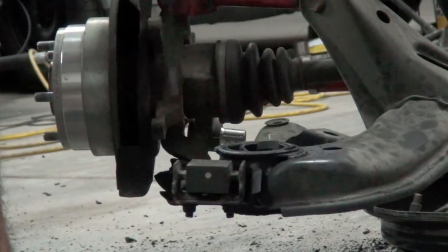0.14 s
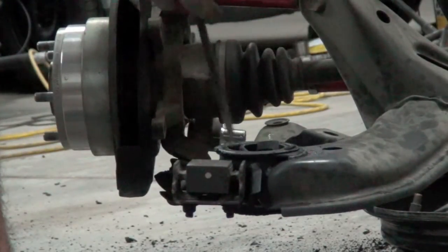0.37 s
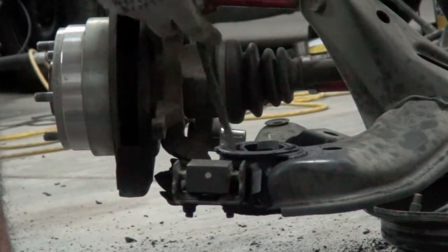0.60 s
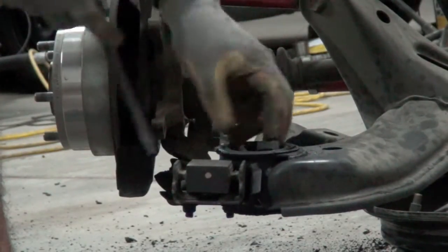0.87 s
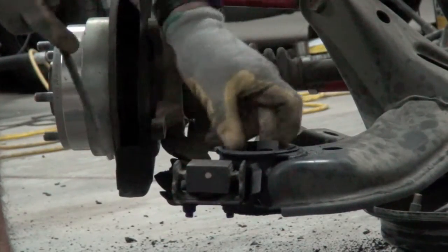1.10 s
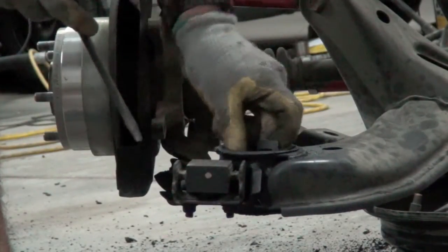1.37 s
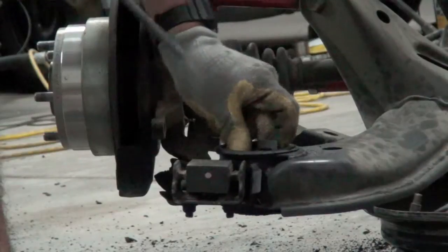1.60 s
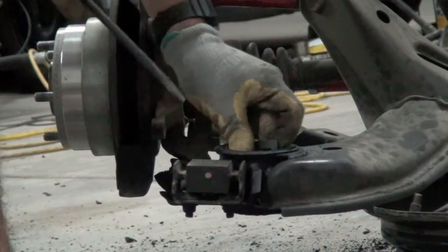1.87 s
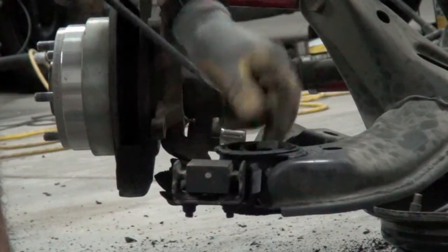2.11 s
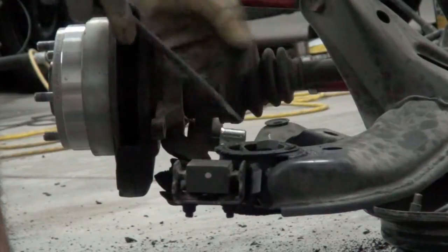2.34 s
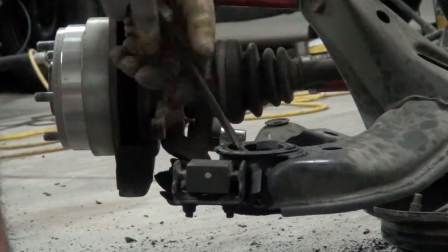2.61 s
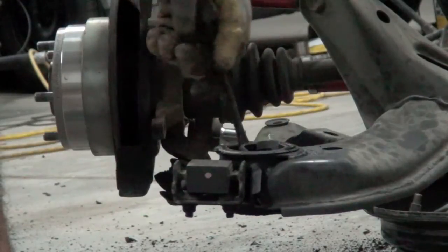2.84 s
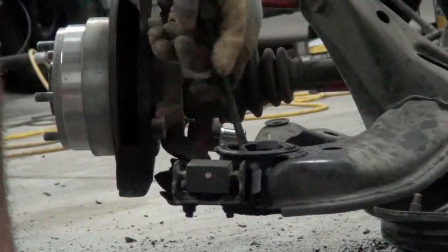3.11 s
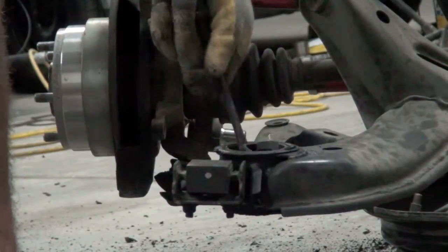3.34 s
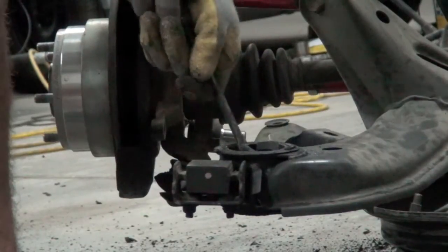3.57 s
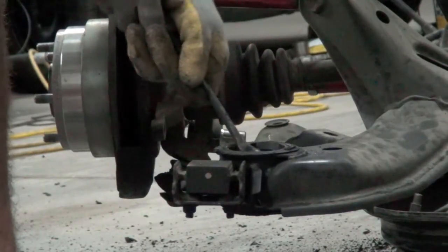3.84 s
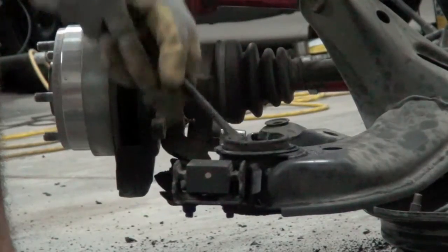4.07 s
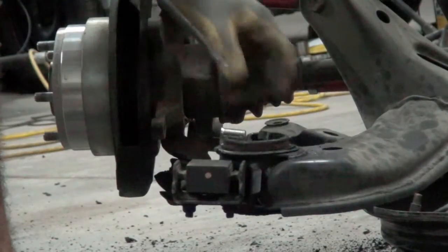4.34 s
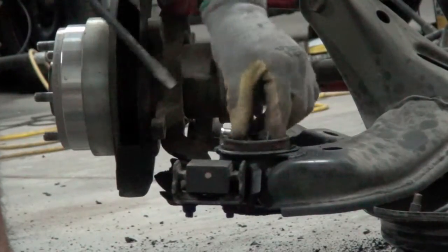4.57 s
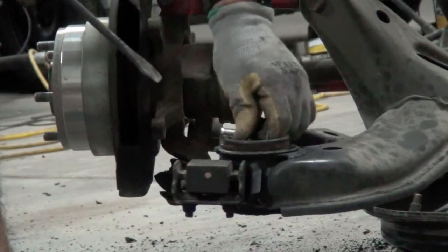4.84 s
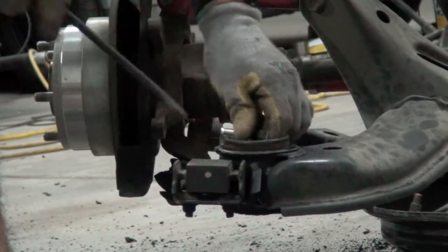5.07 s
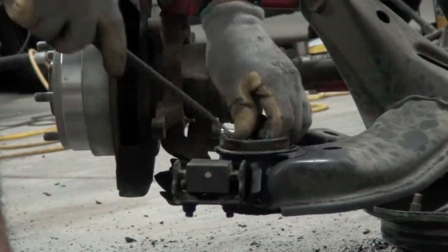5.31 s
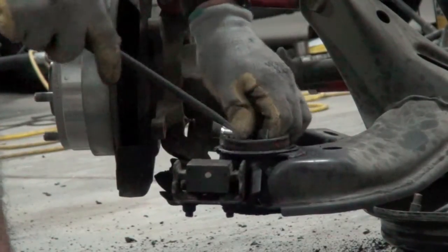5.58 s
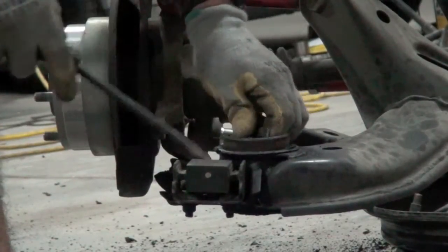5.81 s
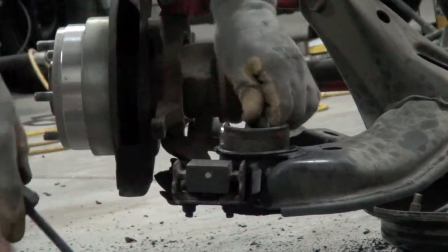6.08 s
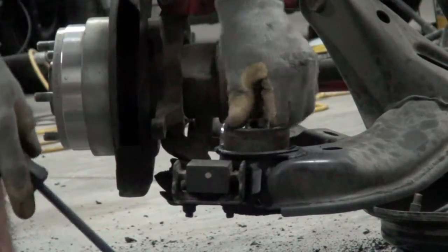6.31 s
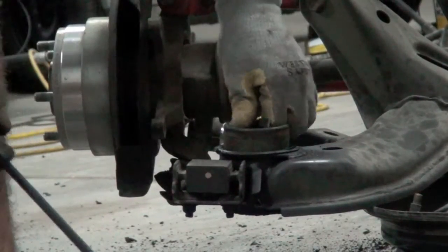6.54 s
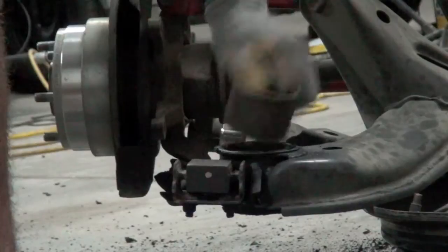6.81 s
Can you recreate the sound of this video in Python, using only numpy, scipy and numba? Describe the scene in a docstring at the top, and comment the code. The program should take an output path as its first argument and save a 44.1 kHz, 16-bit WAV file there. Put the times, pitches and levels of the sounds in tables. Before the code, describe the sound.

Sharp metal strikes recorded close, with about a second of bright room echo. Two strong hits come early, then quiet touches, a knock and a run of tiny rod-tip ticks, a heavy clattering blow midway, small dull clonks as a ring is worked loose, and a closing clank. Far off, an engine climbs and drops repeatedly above rumble and faint hiss.

```python
"""A steel rod knocks and prises metal rings out of a suspension arm in a hard-walled garage, close by.
Each blow sets off fading tones, a dense clank, a bright crack and a low thud, made by short noisy pushes.
Bursts of noise make the rod tip tick and scrape, and one tops up the crack of a blow on the ring.
Fading noise echoes let the garage ring on for a second.
Far away an engine, built from sine waves, revs up again and again over a low hum, rumble and hiss."""
import sys
import numpy as np
from scipy import signal
from scipy.fft import rfft, irfft
from scipy.io import wavfile
from scipy.ndimage import uniform_filter1d, map_coordinates
from numba import njit

SR = 44100
rng = np.random.default_rng(int(sys.argv[2]) if len(sys.argv) > 2 else 0)


def undo_db(level):
    """Turn decibels back into plain size, where 20 dB means ten times bigger."""
    steps = np.asarray(level, float) / 20
    return 10 ** steps


def materialize(psi):
    """Save the field psi as 16-bit PCM at rate SR to the path in sys.argv[1].

    A 1-D psi becomes a single channel; in a 2-D psi each row is a channel.
    """
    bounded = np.clip(np.atleast_2d(psi).T, -1, 1)
    quanta = np.round(bounded * 32767).astype(np.int16)
    wavfile.write(sys.argv[1], SR, quanta)


N = 305613  # length of the scene in samples
LEAD = SR // 5  # samples of room ahead of time 0, for blows that start before it
LONG = 32768  # samples in the push of one blow

# Low rumble and hiss. Each row: pitch in Hz, relative level in dB per Hz.
AIR = [(15, -23), (25, -21), (134, -5.5), (180, -11.5), (301, -17.5), (363, -19), (575, -22), (695, -21),
       (962, -21.5), (1160, -18), (1610, -21.5), (2690, -31.5), (5140, -31.5), (6740, -34.5),
       (16000, -36.5)]
AIR_DB = -57.5  # level of the part above 250 Hz, without the road noise
# Swell of the far road noise. Each row: time in seconds, level against the hiss in dB.
ROAD_SWELL = [(0, -6), (1, 2), (1.6, -13), (3.2, -4.5), (3.9, 4.5), (5.6, -1), (6.93, -1.5)]
# Humming motors. Each row: pitch in Hz, average rms level in dB.
HUM = [(60.4, -66), (68.5, -68.5), (85, -65)]
# Far engine climbing and dropping back. Each row: time in seconds, firing cycles per second in Hz.
REVS = [(0, 25.3), (.8, 28.6), (1.27, 19.5), (2.0, 22), (2.72, 25.4), (3.65, 28.8), (4.05, 29.4),
        (4.42, 21.5), (5.3, 23.4), (6.93, 30)]
# Loudness of the engine. Each row: time in seconds, level in dB before the other engine levels are added.
ENGINE_DB = [(0, -62), (1.2, -57), (2.0, -53), (2.6, -57), (4.0, -58), (5.1, -60.5), (5.7, -53.5),
             (6.93, -58)]
LIFT_DB = -3  # off the throttle while the revs fall
# Engine tones. Each entry: multiple of the cycle rate.
ORDER = (3, 4, 5, 6, 7, 8, 9)
# Strength of those tones, in the same order. Each entry: relative level in dB.
ORDER_DB = (-19, 7, -4, -1.5, -14.5, -4, -7.5)
# The garage lifts some low pitches and swallows others. Each row: pitch in Hz, change in dB.
LOW_ROOM = [(60, -13), (105, -48), (118, 3), (125, 0), (132, 7.5), (137, -1.5), (143, 9), (151, -3.5),
            (157, 5.5), (162, -4.5), (168, 2.5), (178, -8), (188, 0), (200, 0), (215, -12.5), (260, -20)]

# How long the garage echoes. Each row: pitch in Hz, time to fade by 60 dB in seconds.
GARAGE_T60 = [(200, 0.36), (500, 0.66), (1000, 0.75), (2000, 1.09), (4000, 1.314), (8000, 1.006),
              (14000, 0.57)]
GARAGE_DB, GARAGE_WIDE_DB = -6, -25  # echoes alike in both ears; unlike echoes before WIDE shapes them
# The part that differs between left and right. Each row: pitch in Hz, change in dB.
WIDE = [(60, -4), (300, -2.5), (1500, -9.5), (4000, -29), (8000, -33), (12000, -17), (16000, -20)]
# How much the sound leans to the right. Each row: pitch in Hz, side against middle in dB.
RIGHT_LEAN = [(30, -36), (70, -25), (130, -23), (300, -16), (600, -21), (1200, -28), (2400, -24),
              (4500, -40), (9000, -30), (16000, -50)]
# Sound reaching the left a little earlier. Each row: pitch in Hz, gain in dB on the per-sample slope.
LEFT_EARLY = [(300, -10), (1000, -13), (2000, -69), (4500, -29.5), (7500, -12), (9500, -17), (11500, -26),
              (16000, -45)]
# The direct work sounds come still earlier. Each row: pitch in Hz, gain in dB on the per-sample slope.
NEAR_EARLY = [(600, -33), (1400, -13.5), (2500, -12.5), (3800, -20), (6000, -51)]

# Steel or glove dragged over the part.
# Each row: start in seconds, end in seconds, rms level in dB before fades, centre pitch in Hz.
SCRAPES = [(1.006, 1.058, -52.5, 9800), (2.151, 2.175, -45.5, 4100), (2.773, 2.869, -45, 2400),
           (4.675, 4.763, -55.5, 9500), (5.44, 5.477, -50.5, 5050), (5.522, 5.543, -65, 7200),
           (5.882, 5.91, -52, 7300), (6.384, 6.45, -63, 7850), (6.823, 6.867, -42.5, 4440)]
# Rod tip ticking; the first row is the bright top of the ring blow's crack at .646 s.
# Each row: start in seconds, peak level in dB, centre pitch in Hz.
TICKS = [(.646, -14.5, 11400), (1.145, -33, 4140), (1.449, -42, 3050), (2.858, -27.5, 3460),
         (3.103, -44, 7900), (3.155, -42.5, 8400), (3.198, -41, 6670), (3.239, -37, 6740),
         (3.259, -39, 7650), (3.325, -40.5, 8400), (3.3556, -34, 7800), (3.3645, -27, 5800),
         (3.425, -39, 7600), (3.433, -31.5, 5700), (3.497, -38.5, 3930), (3.5324, -36, 6840),
         (3.628, -34.5, 7500), (5.746, -50, 3570), (6.335, -40, 3280), (6.387, -36.5, 3743),
         (6.678, -43, 5380)]
TICK_S = 0.0043  # fading time of each of these short noises
# faint ticks while the rod tip probes the seat: how many, when (s), middle level (dB), middle pitch (Hz)
GRIT_COUNT, GRIT_FROM_S, GRIT_TO_S, GRIT_DB, GRIT_HZ = 14, 2.7, 3.05, -44, 6500

# Tones of the ring. Each row: pitch in Hz, relative level in dB, free 60 dB fading time in seconds.
RING = [(705, -7, .5), (1080, -2, .6), (1660, -9, .5), (2040, -6, .5), (1217, -6, 0.44), (1728, -13, 0.64),
        (1873, -6, 0.64), (1933, -17, 2.3), (2336, -5, 0.65), (2530, -1, 0.45), (2998, -13, 0.77),
        (3122, -16, 0.61), (3278, -4, 0.36), (3321, -8, 0.45), (3402, -4, 0.67), (3472, -18, 1.4),
        (3768, -8, 0.58), (4334, -7, 0.98), (4382, 0, 0.66), (4468, -19, 1.6), (4657, -15, 1.3),
        (4780, -13, 0.86), (5093, -6, 0.29), (5238, -23, 1.7), (6255, -14, 0.36), (6589, -25, 1.0)]
# Tones of the arm. Each row: pitch in Hz, relative level in dB, free 60 dB fading time in seconds.
ARM = [(1065, -4, .4), (678, -4, 0.67), (985, -11, 0.5), (1281, -10, 0.52), (1416, -11, 0.59),
       (1680, -16, 0.71), (1830, -12, 0.87), (2148, 0, 0.46), (2304, -8, 0.69), (2536, -10, 0.84),
       (2799, -4, 0.55), (3079, -14, 1.8), (3133, -12, 1.2), (3418, -17, 1.1), (3763, -4, 0.6),
       (4032, -7, 0.51), (4495, -16, 0.87), (5012, -16, 0.96), (5335, -22, 1.4), (5652, -10, 0.71),
       (5997, -19, 0.89), (6067, -19, 0.65), (6557, -28, 1.5), (6885, -12, 0.38), (7020, -19, 0.92),
       (7456, -22, 0.7), (8721, -21, 0.51)]
# Low tones of the body. Each row: pitch in Hz, relative level in dB, free 60 dB fading time in seconds.
THUD = [(305, 0, .09), (360, -3, .05), (410, -4, .05), (500, -4, .05), (560, -3, .06)]
# Clank of tones too dense to tell apart. Each row: pitch in Hz, relative level in dB per Hz.
CLANK = [(150, -18), (300, -20), (700, 2), (1100, 4), (2000, 4.5), (3800, 3), (6500, -2.5), (10000, -17.5),
         (15000, -32)]
# Crack of the contact. Each row: pitch in Hz, relative level in dB per Hz.
CRACK = [(2500, -55), (5000, 12), (7000, 3.5), (11000, -4), (14000, -18), (16500, -42)]
# Blows on the ring. Each row: start in seconds, blow level in dB, loudest pitch in Hz,
# crack in dB against the blow (before a common lift), share of free ring-on from 0 to 1.
RING_BLOWS = [(-.06, -4, 3170, -8.5, 0.46), (-.03, -18, 1080, -22, 0.27), (.567, -27, 1070, -28, 0.2),
              (.646, -5, 3790, -17.5, 0.24), (.648, -17, 1093, -13, 0.12), (.664, -19, 4380, -11, 0.2),
              (.669, -14, 3280, -23, 0), (2.163, -37, 3750, -16, 0), (2.158, -49, 1560, -25, 0.25),
              (2.18, -40.5, 1660, -24, 0.21), (2.657, -36.5, 716, -46, 0.16),
              (2.871, -18, 1970, -13.5, 0.02), (2.874, -25.5, 1200, -30, 0.09),
              (2.979, -36, 720, -18, 0.14), (5.191, -29, 2400, -43, 0.05), (5.195, -28, 650, -40, 0.03),
              (5.43, -33.5, 1066, -36, 0.11), (5.433, -34, 660, -41, 0.08), (5.723, -31.5, 1050, -47, 0.09),
              (5.896, -35, 1560, -17, .1), (5.914, -31.5, 1100, -22, 0.05), (5.994, -18, 1700, -13.5, .02),
              (6.158, -39.5, 695, -35, 0.03), (6.828, -31.5, 1137, -13, .5), (6.852, -26.5, 1187, -31, 0.6),
              (6.867, -14, 3220, -14, 0.15), (6.869, -15.5, 1090, -33, 0.07)]
# Blows on the arm. Each row: start in seconds, blow level in dB, loudest pitch in Hz,
# crack in dB against the blow (before a common lift), share of free ring-on from 0 to 1.
ARM_BLOWS = [(.672, -34.5, 295, -30, 0.38), (1.679, -64, 1600, -17, .02), (1.889, -55, 770, -7, 0.09),
             (2.047, -57, 960, -2, 0.08), (2.588, -29.5, 2720, -13, 0.06), (2.591, -28, 995, -33, 0.08),
             (3.98, -8.5, 3020, 0, 0.44), (3.988, -13, 1050, -18, .15), (4.0, -21.5, 668, -24, 0.41),
             (4.012, -14.5, 2170, -1.5, 0.33), (4.033, -20, 300, -30, 0.01), (5.009, -51.5, 704, -22, .12),
             (5.234, -37.5, 1150, -32, 0.02), (5.51, -33.5, 1038, -36, 0.16), (5.799, -49, 1070, -22, 0),
             (6.011, -26, 1840, -36, .02), (6.083, -30.5, 1340, -42, 0.08), (6.277, -39, 1083, -38.5, 0),
             (6.918, -29, 743, -24, 0)]
CRACK_LIFT_DB = 5.5
CONTACT_S, CONTACT_SLOPE = 0.014, 0.45  # fading time at 1 kHz; duller blows touch longer
THUD_TOP_DB = 12  # highest thud level against its blow
BODY_HZ, BODY_DB = 450, 4  # blows up to this pitch land on the body: thud level against the blow
CLONK_DB, CLONK_SLOPE = -16, .27  # a lighter blow has more of its own short note


def colour(x, points):
    """Shape a sound by (Hz, dB) points, joined by lines over log pitch."""
    hz, db = np.transpose(points)
    f = np.arange(x.shape[-1] // 2 + 1) * SR / x.shape[-1] + 1
    return irfft(rfft(x) * undo_db(np.interp(np.log(f), np.log(hz), db)), x.shape[-1])


def unit(x):
    """Scale to rms 1."""
    return x / np.sqrt(np.mean(x ** 2, axis=-1, keepdims=True))


def walk(rate):
    """Smooth random drift through about rate new values a second."""
    steps = rng.standard_normal(size=128)
    return map_coordinates(steps, [np.arange(N) / SR * rate], order=3, mode="wrap")


def curve(rows):
    """Columns of a table, after the time column, at every sample."""
    s, *columns = np.transpose(rows)
    return [np.interp(np.arange(N) / SR, s, c) for c in columns]


def add(out, s, sound):
    """Mix a sound in at time s."""
    i = int(s * SR) + LEAD
    out[i:i + len(sound)] += sound[:len(out) - i]


def burst(length, size):
    """Chattering contact: noise that builds up quickly and dies away."""
    t = np.arange(size) / SR
    length = max(length, .0004)
    rise = np.minimum(t / (0.087 * length), 1)
    to_zero = (1 - (t / t[-1]) ** 2) ** 2
    return rng.standard_normal(size) * np.exp(-t / length) * rise * to_zero


def around(x, hz):
    """A broad hump of sound around a centre."""
    return colour(x, [(hz / 6, -26), (hz / 3.9, -7), (hz, 0), (hz * 1.6, -6), (hz * 4, -16)])


def air():
    """Low rumble and hiss from shaped noise, with far road noise that swells and sinks."""
    base = colour(rng.standard_normal((2, N)), AIR)
    base = base / np.std(colour(base[0], [(249, -90), (250, 0)]))
    # played backwards, the same noise serves as a second one
    road = colour(base[:, ::-1], [(300, -9), (800, 0.0), (1200, -5.5), (2200, 2), (5000, -34)])
    return undo_db(AIR_DB) * (base + undo_db(curve(ROAD_SWELL)[0]) * road)


def hum():
    """Motors hum as sine waves of steady pitch that waver a little in level and phase."""
    t = np.arange(N) / SR
    out = 0
    for hz, db in HUM:
        level = np.sqrt(2) * undo_db(db + 3 * walk(8.1))
        out = out + level * np.sin(2 * np.pi * hz * t + 1.1 * walk(5.7))
    return out


def engine():
    """Multiples of the firing cycle rate sweep through the low room resonances."""
    hz, db = curve(REVS)[0], curve(ENGINE_DB)[0]
    falling = 1. * (np.gradient(hz) < 0)
    db = db + LIFT_DB * uniform_filter1d(falling, size=2048)
    turn = 2 * np.pi * np.cumsum(hz) / SR
    room_hz, room_db = np.transpose(LOW_ROOM)
    out = 0
    for k, order_db in zip(ORDER, ORDER_DB):
        heard_db = db + order_db + np.interp(k * hz, room_hz, room_db) + 2.2 * walk(3.1)
        phase = k * turn + 2 * np.pi * rng.random() + 0.13 * walk(3.43)
        out = out + np.sqrt(2) * undo_db(heard_db) * np.sin(phase)
    return out


def garage(x):
    """Dense echoes that fade at their own speed in each band: one alike part, one unlike part."""
    t = np.arange(int(1.5 * SR)) / SR
    hz, t60 = np.transpose(GARAGE_T60)
    echoes = 0
    for f in 120 * 2 ** np.arange(0, 7.1, .5):
        half_octave = [(f / 1.6, -80), (f / 1.19, -3), (f, 0), (f * 1.19, -3), (f * 1.6, -80)]
        band = colour(rng.standard_normal((2, len(t))), half_octave)
        fade_s = np.interp(np.log(f), np.log(hz), t60)
        echoes = echoes + band * np.exp(-np.log(1000) * t / fade_s)
    echoes = echoes * np.clip(t / 0.004, 0, 1)  # the first walls are metres away
    return signal.fftconvolve(x[None], unit(echoes) / np.sqrt(len(t)), axes=1)[:, :len(x)]


def scrapes():
    """Dense catches of uneven size while the contact slides."""
    out = np.zeros(N + LEAD)
    t = np.arange(8192) / SR
    for start, end, db, hz in SCRAPES:
        uneven_db = np.minimum(3 * rng.exponential(size=len(t)), 14)
        catches = unit(around(rng.standard_normal(len(t)) * undo_db(uneven_db), hz))
        rise = t / (0.45 * (end - start))
        fall = (end - start - t) / 0.0041 + 1
        add(out, start, undo_db(db) * catches * np.clip(np.minimum(rise, fall), 0, 1))
    return out


def ticks_and_crack_top():
    """Short grits of noise: the bright top of one ring blow's crack, then clear and faint rod tip ticks."""
    out = np.zeros(N + LEAD)
    chance = rng.random((GRIT_COUNT, 3))
    faint_s = GRIT_FROM_S + (GRIT_TO_S - GRIT_FROM_S) * chance[:, 0]
    faint_db = GRIT_DB + 6 * (chance[:, 1] - .5)
    faint_hz = GRIT_HZ * 2 ** (chance[:, 2] - .5)
    for s, db, hz in [*TICKS, *np.c_[faint_s, faint_db, faint_hz]]:
        grit = around(burst(TICK_S, size=8192), hz)
        add(out, s, undo_db(db) * grit / np.abs(grit).max())
    return out


def softness(hz):
    """Near 1 for low, soft blows, near 0 for bright, hard ones."""
    return 1 / (1 + (hz / 2000) ** 6)


def landing(modes, hz):
    """Where the rod lands decides which tones move; a soft blow picks out its nearest one."""
    above = np.log2(np.array(modes)[:, 0] / hz)  # octaves above the blow's pitch
    octaves = np.abs(above)
    nearest_db = 7 * softness(hz) * np.exp(-(octaves / 0.077) ** 2)
    dull_db = 3 * softness(hz) * np.maximum(above, 0)
    return nearest_db - 3.3 * octaves - dull_db + 1.5 * rng.standard_normal(len(modes))


@njit
def ring_modes(push, pole, gain):
    """A bank of decaying tones driven by one push."""
    out = np.zeros(len(push))
    for m in range(len(pole)):
        z = 0j
        for i in range(len(push)):
            z = z * pole[m] + push[i]
            out[i] += gain[m] * z.imag
    return out


def ring(push, modes, tilt_db, share):
    """Tones with a weaker close twin each, damped to a share of their free decay; peak 1."""
    hz, db, t60 = np.tile(np.transpose(modes), 2)
    twin = np.arange(len(hz)) >= len(modes)
    hz = hz * (1 + 0.011 * twin * rng.standard_normal(len(hz)))
    fade_s = np.clip(share, .02, 2) * t60
    pole = np.exp(2j * np.pi * hz / SR - np.log(1000) / (fade_s * SR))
    gain = undo_db(db + np.tile(tilt_db, 2) - 3.8 * twin) * rng.choice([-1., 1.], len(hz))
    sound = ring_modes(push * rng.choice([-1., 1.]), pole, gain)
    return sound / np.abs(sound).max()


def blows(table, modes, tone_db, clank_db, shiver_db, hard_thud_db, thud_slope, bright_db):
    """Each blow rings the part near its loudest pitch, clonks, clanks, shivers on, cracks and thuds."""
    out = np.zeros(N + LEAD)
    clank_hz, clank_shape_db = np.transpose(CLANK)
    for s, db, hz, crack_db, share in table:
        contact = CONTACT_S * (1000. / hz) ** CONTACT_SLOPE
        # the lighter the blow, the more of it is thud
        thud_db = min(hard_thud_db - thud_slope * db, THUD_TOP_DB) if hz > BODY_HZ else BODY_DB
        # one firm contact, then fainter chatter
        push = 0.068 * burst(contact, size=LONG)
        push[0] = 1
        tones = ring(push, modes, landing(modes, hz), share)
        # the whole suspension shakes on as long as no glove damps it
        shiver = undo_db(shiver_db) * burst(0.2 * share, size=LONG)
        near_db = clank_shape_db - 4.5 * np.abs(np.log2(clank_hz / hz))
        clank = colour(burst(contact, size=LONG) + shiver, np.c_[clank_hz, near_db])
        crack = colour(burst(1.06 * contact, size=8192), CRACK)
        crack = colour(crack, [(6000, 0), (13000, bright_db)])
        # a hard blow spreads over countless tones, a soft one clonks on its own pitch
        clonk = ring(push, [(hz, 0, .4)], [0.], (.09 + .4 * share) * min(1000 / hz, 1) ** .8)
        thud = ring(push, THUD, landing(THUD, min(hz, 450.)), .45 + 2.2 * share)
        add(out, s, undo_db(db + tone_db - 8.8 * (0.5 - softness(hz))) * tones)
        add(out, s, undo_db(db + CLONK_DB - CLONK_SLOPE * db) * clonk)
        add(out, s, undo_db(db + clank_db) * clank / np.abs(clank).max())
        add(out, s, undo_db(db + crack_db + CRACK_LIFT_DB) * crack / np.abs(crack).max())
        add(out, s, undo_db(db + thud_db) * thud)
    return out


def scene():
    """Middle and unlike parts of all sources, turned into left and right."""
    work = blows(RING_BLOWS, RING, tone_db=-5, clank_db=-2, shiver_db=-10.5,
                 hard_thud_db=-28, thud_slope=0.6, bright_db=5)
    work = work + blows(ARM_BLOWS, ARM, tone_db=-2.5, clank_db=0.5, shiver_db=-1.5,
                        hard_thud_db=-20.5, thud_slope=0.74, bright_db=6)
    work = work + ticks_and_crack_top() + scrapes()
    # the work sounds lose their bass below about 210 Hz
    work = signal.sosfilt(signal.butter(3, 210, "high", fs=SR, output="sos"), work)
    wet, wide = garage(work)[:, LEAD:]
    direct = work[LEAD:]
    hiss, other_hiss = air()
    mid = direct + undo_db(GARAGE_DB) * wet + hiss + engine() + hum()
    side = colour(undo_db(GARAGE_WIDE_DB) * wide + undo_db(-10.5) * other_hiss, WIDE)
    side = side - colour(mid, RIGHT_LEAN)
    # adding a sound's slope on the left moves it slightly earlier there
    side = side + colour(np.gradient(mid), LEFT_EARLY) + colour(np.gradient(direct), NEAR_EARLY)
    return np.array([mid + side, mid - side])


def low_pass(x):
    """Removes everything above the highest recorded frequency."""
    return signal.sosfilt(signal.butter(12, 16660, fs=SR, output="sos"), x)


def record(dry):
    """The input stage rounds the hardest peaks and cuts the top above 15950 Hz."""
    rounded = 1.111 * np.tanh(dry / 1.084)
    top_cut = signal.ellip(10, .2, 70, 15950, fs=SR, output="sos")
    mix = signal.sosfilt(top_cut, rounded)
    return low_pass(mix)


dry = scene()
out = record(dry)
materialize(out)
```